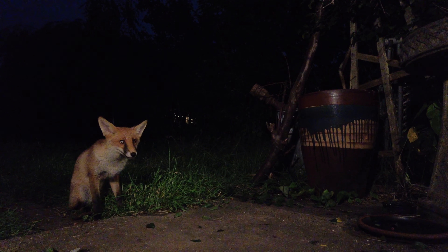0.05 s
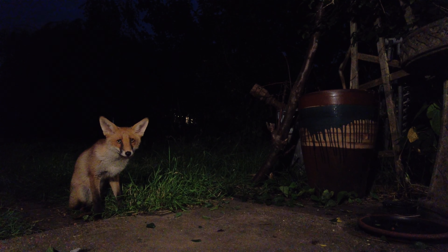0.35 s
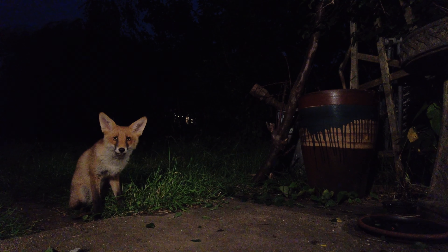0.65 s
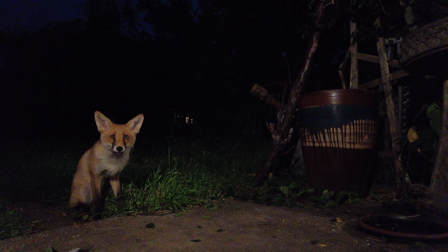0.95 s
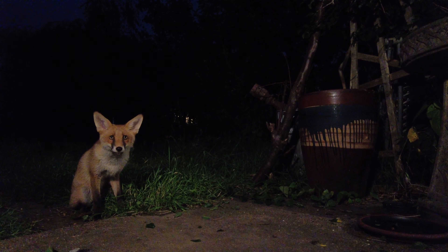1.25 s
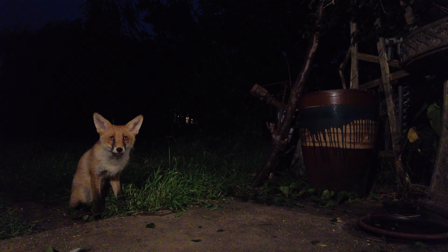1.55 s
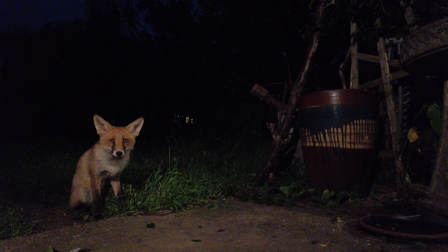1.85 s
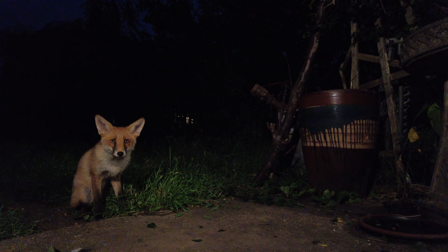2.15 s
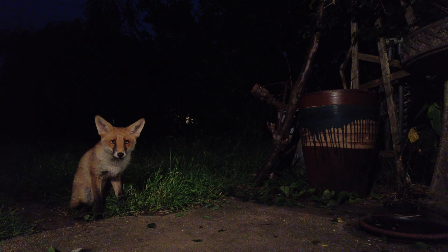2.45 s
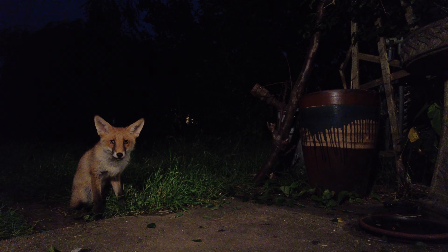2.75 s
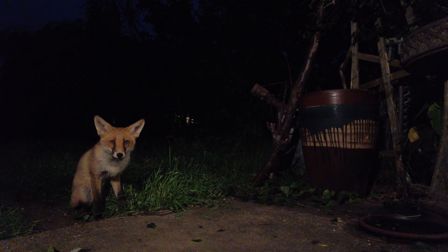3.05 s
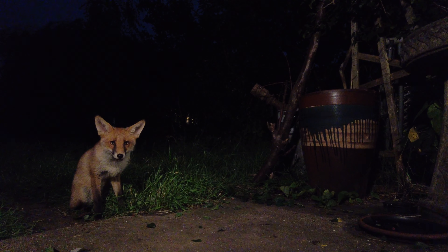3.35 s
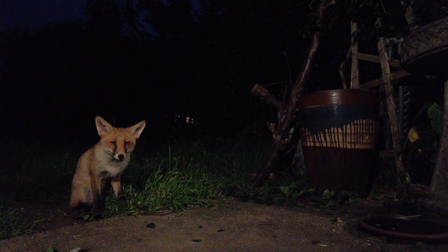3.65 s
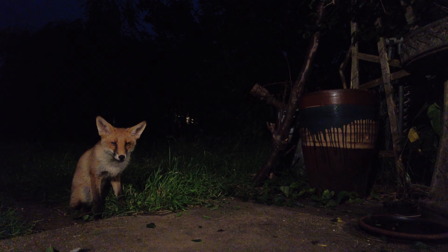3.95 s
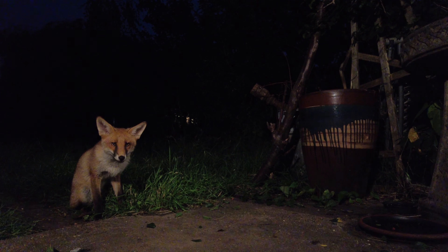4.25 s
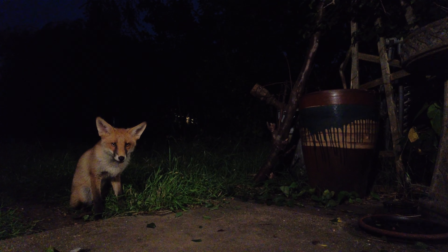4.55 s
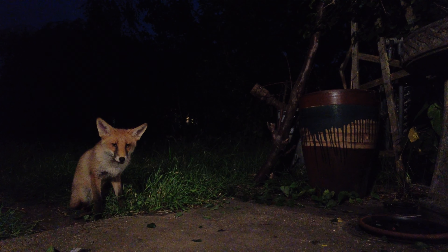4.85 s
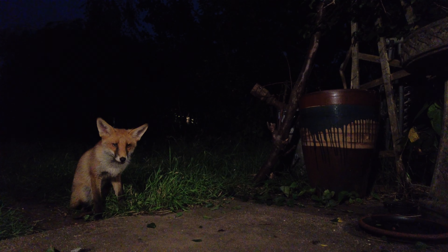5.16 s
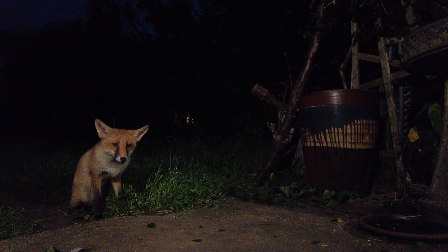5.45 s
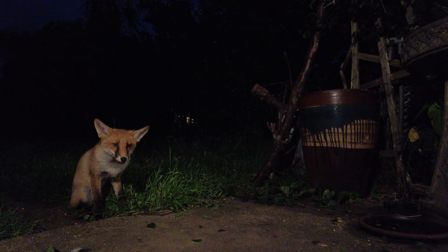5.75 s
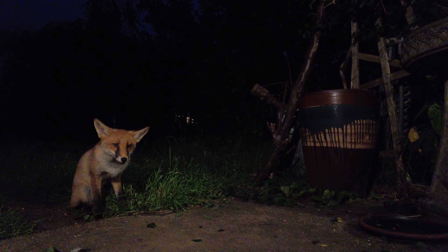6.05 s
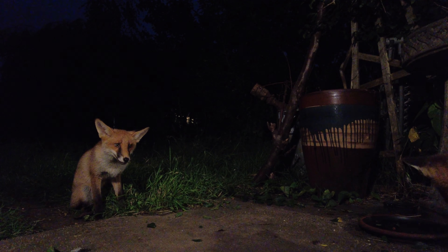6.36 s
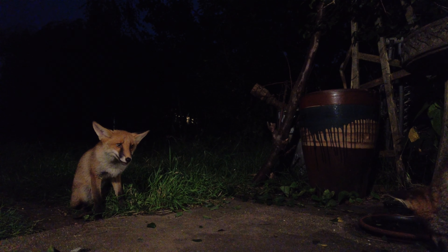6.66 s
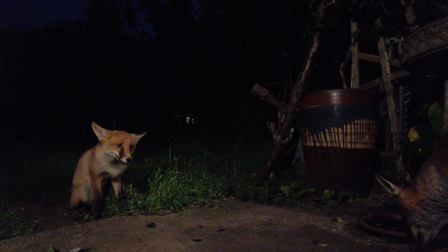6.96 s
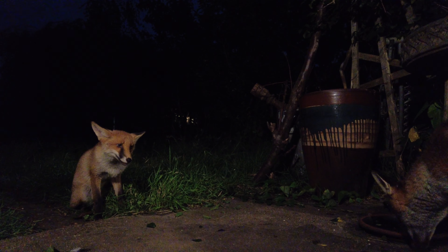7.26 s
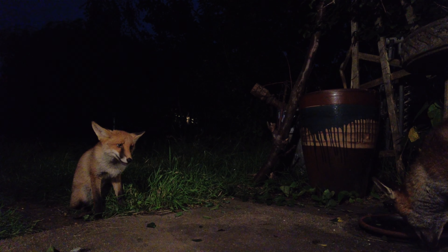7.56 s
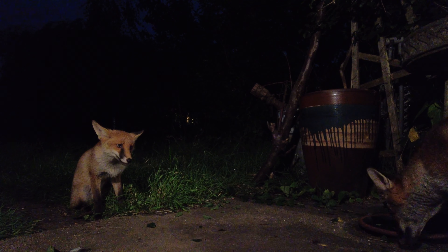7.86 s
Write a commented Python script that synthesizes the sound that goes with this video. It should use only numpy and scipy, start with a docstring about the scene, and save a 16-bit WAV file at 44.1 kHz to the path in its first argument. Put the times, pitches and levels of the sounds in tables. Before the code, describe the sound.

A low rumble of far roads and soft night air fills a garden, heard in stereo from the patio. After a few seconds a young fox moans quietly, yips three times and whines in high, quavering tones from a few metres away. Its calls turn into brief harsh yelps and one last unsteady whine. Faint paw scuffs on paving and grass fall between the calls.

```python
"""Fox cubs in a night garden

A few metres from a stereo microphone on the patio, one cub moans low through its nose, then yips,
whines in long wavering notes and yelps: nearly pure vocal-fold tones, hoarse when low, bright when
strained. Paws scuff the ground and a thin hiss lies under the last calls.
Patio and fence give a short echo; distant traffic rumbles underneath."""
import sys
import numpy as np
from scipy import signal
from scipy.fft import rfft, irfft, next_fast_len
from scipy.io import wavfile
from scipy.ndimage import uniform_filter1d

SR = 44100
rng = np.random.default_rng(int(sys.argv[2]) if len(sys.argv) > 2 else 0)


def unload_audio(sound):
    """Save the sound as a 16-bit wav file, at the path given as the first command line argument."""
    columns = np.transpose(np.atleast_2d(sound))
    # keep every value between -1 and 1, then stretch to whole-number steps
    steps = np.round(np.clip(columns, -1, 1) * 32767)
    wavfile.write(sys.argv[1], SR, steps.astype(np.int16))


N = 348390
T = np.arange(N) / SR
LEFT_RIGHT = np.array([[1], [-1]])


def undb(db):
    """Decibels to gain."""
    return 10 ** (np.asarray(db) / 20)


def unit(x):
    """Scale to rms 1."""
    return x / np.sqrt(np.mean(x ** 2) + 1e-20)


def at_hz(points, hz):
    """Read (frequency, value) points on a log-frequency axis."""
    f, value = np.transpose(points)
    return np.interp(np.log(np.maximum(hz, 1)), np.log(f), value)


def hump(hz, centre_hz, octaves):
    """Gain of a bell-shaped band."""
    return np.exp(-2 * (np.log2(hz / centre_hz) / octaves) ** 2)


def bell(t, centre, half_width):
    """A smooth bump in time, of height 1."""
    return np.exp(-((t - centre) / half_width) ** 2)


def swell(t, start, length):
    """A rounded rise and fall."""
    return np.sin(np.pi * np.clip((t - start) / length, 0, 1))


def decay(t, t60):
    """A fall of 60 dB every t60 seconds."""
    return np.exp(-np.log(1000) * t / t60)


def noise(gain, size=N):
    """Noise of rms 1 whose spectrum follows gain(hz)."""
    padded = next_fast_len(size)
    hz = np.maximum(np.fft.rfftfreq(padded, 1 / SR), 1)
    spectrum = rfft(rng.standard_normal(padded)) * gain(hz)
    return unit(irfft(spectrum, padded)[:size])


def walk(rate, size=N):
    """A smooth random drift of spread 1 that moves about rate times a second."""
    step = 16
    coarse = noise(lambda hz: 1 / (1 + (hz / step / rate) ** 4), size // step + 2)
    return np.interp(np.arange(size) / step, np.arange(len(coarse)), coarse)


# far roads as they reach the patio: (frequency [Hz], relative density [dB])
RUMBLE_SPECTRUM = [(12, -12.5), (24, 1), (33, -2), (45, -3), (58, -1), (72, -20.5), (100, -28), (300, -100)]
# their rise and fall: (time [s], level [dB])
RUMBLE_SWELLS = [(0, -55.5), (.5, -49), (.85, -52), (1.6, -49.5), (2.3, -50), (3.15, -51.5), (3.6, -51),
                 (5, -50), (7.9, -55)]

def traffic_rumble(lean_right_db=1.26, side_db=-22):
    """The deep sound of far roads, nearly the same on both sides of the microphone."""
    mid, side = (noise(lambda hz: undb(at_hz(RUMBLE_SPECTRUM, hz))) for _ in range(2))
    level_db = np.interp(T, *np.transpose(RUMBLE_SWELLS)) - lean_right_db * LEFT_RIGHT
    return undb(level_db) * (mid + undb(side_db) * LEFT_RIGHT * side)


# traffic and night air all round the garden: (frequency [Hz], relative density [dB])
AIR_SPECTRUM = [(55, -19.5), (90, 0), (160, -5), (280, -9.5), (450, -17), (800, -23.5), (1450, -23.5),
                (2400, -33), (3100, -33), (3700, -37), (6000, -39), (7000, -42.5), (9300, -45),
                (10500, -48), (12800, -49.5)]
# how alike left and right pick it up: (frequency [Hz], correlation [-1 to 1])
AIR_CORRELATION = [(100, 0.98), (300, 0.75), (520, .3), (890, -0.58), (1520, 0.43), (2600, -0.015),
                   (9000, -0.073)]

def night_air(mid_db=-61, fade_db_per_s=0.1634):
    """A diffuse wash of distant traffic and air, fading very slightly."""
    mid, side = (noise(lambda hz: undb(at_hz(AIR_SPECTRUM, hz))) for _ in range(2))
    alike = at_hz(AIR_CORRELATION, np.fft.rfftfreq(N, 1 / SR))
    side = irfft(rfft(side) * np.sqrt((1 - alike) / (1 + alike)), N)
    return undb(mid_db - fade_db_per_s * T) * (mid + LEFT_RIGHT * side)


# single engines far off, centre image: (start [s], length [s], pitch [Hz], level [dB])
ENGINE_NOTES = [(-0.16, 1.15, 63.3, -49.5), (0.17, 0.67, 57, -50), (1.54, 1, 116, -59.5),
                (0, 0.87, 96, -61), (0.56, 0.79, 197, -63), (0.6, 1.97, 215, -67.5),
                (3.0, 0.76, 227, -62.5), (4.5, 1.84, 228, -68)]

def far_engines(wander=0.0092, throb_db=2):
    """Each engine is one wavering low note that swells and fades."""
    out = np.zeros(N)
    for start, length, hz, db in ENGINE_NOTES:
        envelope = undb(db + throb_db * walk(16)) * swell(T, start, length)
        pitch = hz * (1 + wander * walk(2.7))
        out += envelope * np.sin(2 * np.pi * np.cumsum(pitch) / SR)
    return out


# left channel's lead at the microphone, twisted by the nearest wall: (frequency [Hz], phase [rad])
LEFT_LEAD = [(550, 0.5), (690, .4), (780, 1.18), (950, 1.85), (1350, -0.5), (1600, 1.34), (2150, -2),
             (2760, -1.5), (12000, -2)]

def garden(sound, echo_t60_s=0.07, echo_above_hz=1620, tail_t60_s=0.53, tail_db=-26):
    """Paving and fence scatter the shorter waves briefly; trees give a faint tail."""
    t, channels = T[:SR // 2], []
    padded = next_fast_len(N + len(t))
    source = rfft(sound, padded)
    lead = at_hz(LEFT_LEAD, np.fft.rfftfreq(padded, 1 / SR))
    scattering = signal.butter(2, echo_above_hz, "high", fs=SR, output="sos")
    for side in (1, -1):
        echo, tail = (unit(rng.standard_normal(len(t)) * decay(t, t60)) / np.sqrt(len(t))
                      for t60 in (echo_t60_s, tail_t60_s))
        reflections = signal.sosfilt(scattering, echo) + undb(tail_db) * tail
        direct = np.exp(.5j * side * lead)
        channels.append(irfft(source * (direct + rfft(reflections, padded)), padded)[:N])
    return np.array(channels)


# faint treble in the garden under the last calls: (centre [Hz], width [octaves], level [dB])
HISS_BANDS = [(11000, 0.11, -83), (8000, 0.46, -81.5)]

def hiss(start_s=7.17, rise_s=.035, t60_s=2.1, flicker_db=2):
    """A thin, flickering hiss that comes in quickly and fades slowly."""
    t = np.maximum(T - start_s, 0)
    envelope = np.minimum(t / rise_s, 1) * decay(t, t60_s)
    return envelope * sum(undb(db + flicker_db * walk(25)) * noise(lambda hz: hump(hz, centre, octaves))
                          for centre, octaves, db in HISS_BANDS)


# paws on paving and dry grass, a few metres off:
# (time [s], centre [Hz], width [octaves], rise [s], time to fall 30 dB [s], level [dB])
PAW_SCUFFS = [(0.314, 1590, 2.14, 0.00068, .022, -57), (0.901, 4740, .15, .001, .024, -72),
              (.903, 6000, 0.31, .017, 0.049, -72), (4.49, 7950, 3.5, 0.012, .08, -74.5),
              (4.795, 8940, 3.8, 0.0084, .09, -72), (4.959, 8000, 2.9, .022, .088, -74.5),
              (5.203, 1250, 0.79, .002, .025, -64), (5.237, 8940, 1.16, 0.0058, 0.031, -69),
              (6.166, 2490, .4, 0.0037, 0.027, -56), (6.57, 9000, 0.7, .001, .008, -65),
              (6.576, 9500, 1.8, .006, .18, -79), (6.604, 1210, 0.35, .0065, 0.032, -56.5),
              (6.633, 1190, .9, .0025, .05, -59.5), (7.392, 218, 2, 0.024, 0.035, -51.5)]

def paws(grain_db=3):
    """Each step is a short, grainy burst of friction."""
    out, t = np.zeros(N + SR), T[:SR]
    for time, centre_hz, octaves, rise, t30, db in PAW_SCUFFS:
        band = noise(lambda hz: hump(hz, centre_hz, octaves), SR)
        friction = unit(band * undb(grain_db * walk(300, SR)))
        envelope = np.minimum(t / rise, 1) * decay(np.maximum(t - rise, 0), 2 * t30)
        start = int(time * SR)
        out[start:start + SR] += undb(db) * envelope * friction
    return out[:N]


# brief catches in the cub's voice: (time [s], half width [s], depth [dB])
VOICE_CATCHES = [(3.95, 0.016, 12), (5.306, 0.0058, 3), (5.76, .025, 7), (6.085, 0.009, 2.5),
                 (6.719, 0.003, 9), (7.246, 0.0041, 3.5), (7.589, 0.0079, 10)]

def breath(start, length, attack, release):
    """The samples that a call covers, and its envelope, which dips where the voice catches."""
    span = np.flatnonzero((T >= start) & (T <= start + length))
    t = T[span]
    gate = np.clip(np.minimum((t - start) / attack, (start + length - t) / release), 0, 1)
    dip_db = sum(db * bell(t, time, width) for time, width, db in VOICE_CATCHES)
    return span, gate * undb(-dip_db)


# the low moan, faint at the microphone: (time [s], pitch [Hz])
MOAN_MELODY = [(3.85, 311), (3.922, 293.3), (3.952, 320.2), (4.024, 310.5), (4.138, 331.0), (4.352, 313.6),
               (4.442, 332), (4.46, 321)]

def moan(first_db=-60.5, second_db=-84.5, third_db=-79.5, open_db=15, closing_s=0.17, nasal_db=13.5):
    """The second harmonic fades as the mouth closes; the third rings in a narrow nasal resonance."""
    start, jitter, shimmer_db = 3.84, 0.0085, 2.5
    span, envelope = breath(start, length=0.628, attack=.015, release=0.027)
    hz = np.interp(T[span], *np.transpose(MOAN_MELODY))
    phase = 2 * np.pi * np.cumsum(hz * (1 + jitter * walk(70, len(span)))) / SR
    mouth_db = open_db * np.exp(-(T[span] - start) / closing_s)
    ring_db = nasal_db * hump(3 * hz, centre_hz=921, octaves=0.14)
    voice = sum(undb(db + shimmer_db * walk(27, len(span))) * np.sin(k * phase)
                for k, db in enumerate([first_db, second_db + mouth_db, third_db + ring_db], 1))
    out = np.zeros(N)
    out[span] = envelope * np.sqrt(2) * voice
    return out


# higher notes carry louder, up to the mouth's first resonance: (pitch [Hz], fundamental level [dB])
PITCH_LOUDNESS = [(530, -53), (620, -47.5), (710, -43.5), (780, -37), (860, -32.5), (1010, -33)]

def effort(hz, nose_hz, gain_db, second_db, nasal_db, over_db, push_above_db=-37, push_ratio=1.87):
    """Levels of the fundamental, the second harmonic ringing in the nose, and overtones when pushed."""
    first_db = at_hz(PITCH_LOUDNESS, hz)
    ring_db = nasal_db * hump(2 * hz, nose_hz, octaves=0.31)
    push_db = push_ratio * np.maximum(first_db - push_above_db, 0)
    return gain_db + first_db, gain_db + second_db + ring_db, gain_db + over_db + push_db


# the throat's colouring of the overtones: (frequency [Hz], relative level [dB])
THROAT_COLOUR = [(1700, -6), (2100, -3), (2650, 1.5), (3050, -8), (3400, -18.5), (3900, -18), (4600, -14),
                 (5400, -31), (7000, -17.5), (8000, -23.5), (11000, -37), (12500, -48)]
# strain in the last calls: (start [s], length [s], brightening [dB/octave], overtone lift [dB],
# mouth resonance [Hz], resonance gain [dB], rasp level [dB])
VOICE_STRAINS = [(6.472, 0.071, 11.5, 3, 5600, 12, -85), (6.677, 0.058, 25, 19.5, 4400, 21, -70),
                 (7.071, 0.055, 14.5, 14.5, 3480, 10.5, -73), (7.495, 1, 8, 3.5, 3400, 13, -100)]

def overtones_and_rasp(t, hz, phase, level_db, fall_db_per_octave=12, flutter_db=3):
    """Tight folds lift and brighten harmonics 3-13 and add rasp; the open mouth rings as they pass."""
    k = np.arange(3, 14)[:, None]
    colour_db = at_hz(THROAT_COLOUR, k * hz) - fall_db_per_octave * np.log2(k)
    rasp = 0
    for start, length, tilt_db, lift_db, mouth_hz, mouth_db, rasp_db in VOICE_STRAINS:
        strain = np.sqrt(np.abs(swell(t, start, length)))
        colour_db += strain * (tilt_db * np.log2(k) + mouth_db * hump(k * hz, mouth_hz, octaves=0.23))
        level_db = level_db + strain * lift_db
        rasp = rasp + strain * undb(rasp_db)
    weight = undb(colour_db)
    flutter = undb(flutter_db * np.array([walk(20, len(t)) for _ in k]))
    overtones = (weight * flutter * np.sin(k * phase)).sum(0) / np.sqrt((weight ** 2).sum(0) / 2)
    # turbulence leaves the folds in one puff a cycle
    puffs = (1 + np.cos(phase)) * noise(lambda f: hump(f, centre_hz=4500, octaves=2.6), len(t))
    return undb(level_db) * overtones + rasp * puffs


def cub_voice(span, hz, nose_hz, timbre, quaver=.008, shimmer_db=.7, slack_hz=730, hoarse_db=17):
    """A nearly pure vocal-fold tone; on low notes the slack folds beat unevenly and turn hoarse."""
    size = len(span)
    husk_db, *levels = timbre
    first_db, second_db, over_db = effort(hz, nose_hz, *levels)
    slack = np.clip((slack_hz - hz) / 100, 0, 1)
    hoarse = undb(husk_db + hoarse_db * slack)
    jitter = 0.0012 + 0.048 * hoarse
    hz = hz * (1 + quaver * walk(45, size) + jitter * walk(200, size))
    phase = 2 * np.pi * np.cumsum(hz) / SR
    first = undb(first_db) * np.sin(phase)
    second = undb(second_db + 1.5 * walk(70, size)) * np.sin(2 * phase)
    edge = overtones_and_rasp(T[span], hz, phase, over_db)
    husk = undb(first_db) * hoarse * noise(lambda f: hump(f, centre_hz=1220, octaves=.8), size)
    voice = np.sqrt(2) * (first + second) + edge + husk
    return voice * undb(shimmer_db * walk(67, size))


# whines a few metres from the microphone: (start [s], length [s], attack [s], release [s], then the
# timbre: husk [dB], gain [dB], second harmonic [dB], nasal resonance [dB], overtones [dB])
WHINE_CALLS = [(5.473, 0.48, .012, .08, -43, -1.5, -59, 10.5, -75.5),
               (5.936, 0.452, 0.13, 0.042, -41.5, -0.5, -56, 5, -77.5),
               (7.362, .537, .004, 0.0026, -39, -0.63, -59.5, 3.5, -75)]
# one pitch line for each whine: (time [s], pitch [Hz])
WHINE_MELODIES = [
    [(5.484, 854), (5.51, 870), (5.54, 782), (5.57, 839), (5.6, 791), (5.65, 795), (5.7, 745), (5.802, 705),
     (5.87, 674), (5.92, 728)],
    [(5.96, 712), (6.036, 813), (6.08, 741), (6.12, 780), (6.2, 753), (6.29, 695.5), (6.38, 765)],
    [(7.366, 629), (7.382, 635), (7.404, 765), (7.416, 746), (7.486, 796), (7.506, 725.6), (7.52, 642.5),
     (7.534, 633), (7.554, 661), (7.566, 800.4), (7.61, 671), (7.626, 627), (7.678, 744), (7.728, 633),
     (7.776, 702), (7.814, 666.6), (7.836, 669), (7.89, 653.6)],
]

def whines(nose_hz=1301):
    """Long calls held on a wavering pitch."""
    out = np.zeros(N)
    for (start, length, attack, release, *timbre), melody in zip(WHINE_CALLS, WHINE_MELODIES):
        span, envelope = breath(start, length, attack, release)
        hz = np.interp(T[span], *np.transpose(melody))
        hz = uniform_filter1d(hz, size=300, mode="nearest")
        out[span] += envelope * cub_voice(span, hz, nose_hz, timbre)
    return out


# yips and yelps from the same spot: (start [s], length [s], release [s], crest after [s], crest [Hz],
# sag [Hz/s^2], break after [s], break half width [s], break depth [Hz], then timbre as for the whines)
YIP_CALLS = [(4.846, 0.075, .012, 0.021, 570, 48400, 0, .02, 2, -34, -7.5, -54.5, 13, -84),
             (5.021, .11, .014, 0.042, 741.4, 31700, .074, .018, 169, -32, 0, -59, 13, -84),
             (5.234, .111, .011, 0.0079, 811, 4820, .074, 0.027, 192, -35, 1.5, -61, 13.5, -80),
             (6.471, .1, .04, 0.0044, 874, 19700, 0, .02, -2, -42.5, 0, -58, 6, -80.5),
             (6.666, 0.081, .014, .026, 998, 75000, .05, .012, 72, -32, -3, -58, -21, -88),
             (7.058, 0.027, .004, 0.017, 811, 50000, 0, .02, 14, -17, -17, -68.5, -2, -86),
             (7.079, 0.11, .07, 0.011, 912, 87000, .04, .012, 37, -35, 0.5, -52.5, -34, -81.5),
             (7.223, .019, .008, .002, 693, 380000, 0, .02, 2.5, -26, 2.5, -60.5, 5, -78.5),
             (7.236, 0.093, .01, .082, 861, 20900, .027, .032, 197, -40.5, -2, -59, 0, -82.5)]

def yips(nose_hz=1247, attack_s=.006, lowest_hz=528):
    """Short calls: the pitch falls away on both sides of its crest and dips where the voice breaks."""
    out = np.zeros(N)
    for start, length, release, crest, crest_hz, sag, break_at, width, break_hz, *timbre in YIP_CALLS:
        span, envelope = breath(start, length, attack_s, release)
        t = T[span] - start
        arch = crest_hz - sag * (t - crest) ** 2
        hz = np.maximum(arch - break_hz * bell(t, break_at, width), lowest_hz)
        out[span] += envelope * cub_voice(span, hz, nose_hz, timbre)
    return out


def scene():
    """The cubs in the garden, heard from the patio over the far traffic."""
    nearby = yips() + whines() + moan() + paws() + hiss()
    return garden(nearby) + traffic_rumble() + night_air() + far_engines()


def record(dry):
    """The recorder cuts the top steeply."""
    top_hz = 12800
    return signal.sosfilt(signal.ellip(10, .2, 70, top_hz, fs=SR, output="sos"), dry)


dry = scene()
out = record(dry)
unload_audio(out)
```